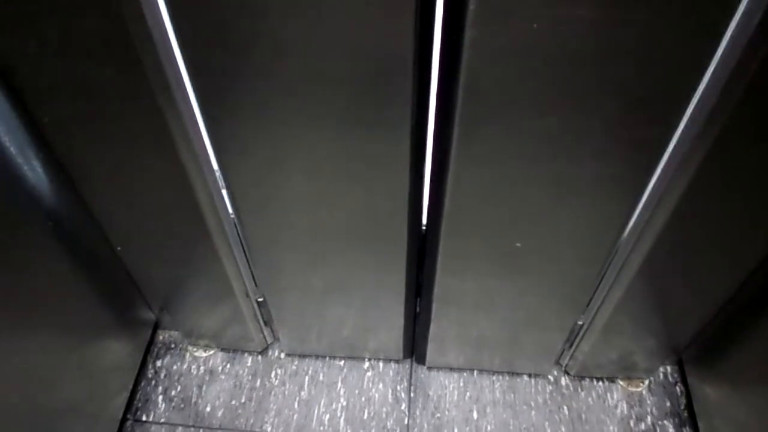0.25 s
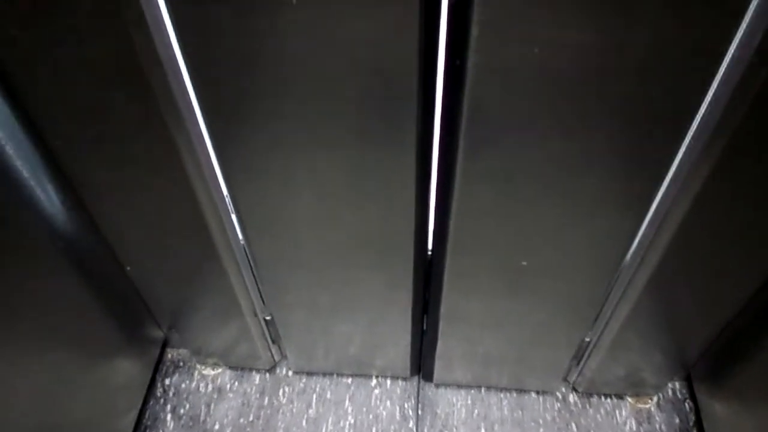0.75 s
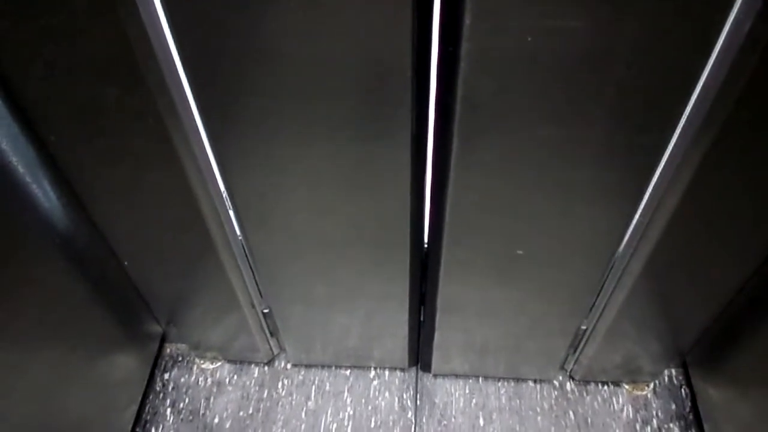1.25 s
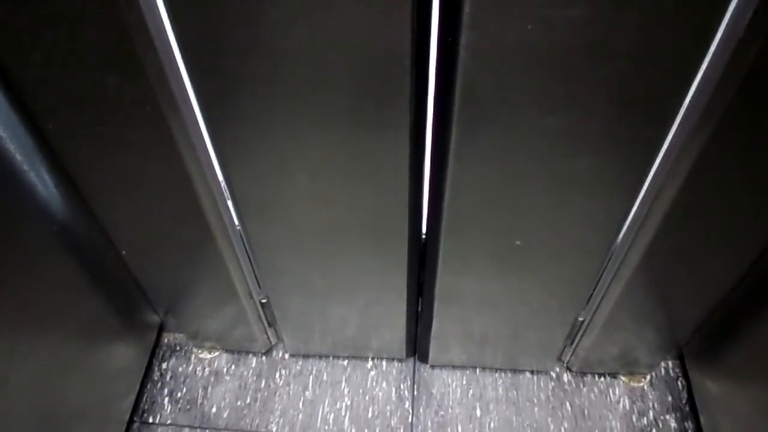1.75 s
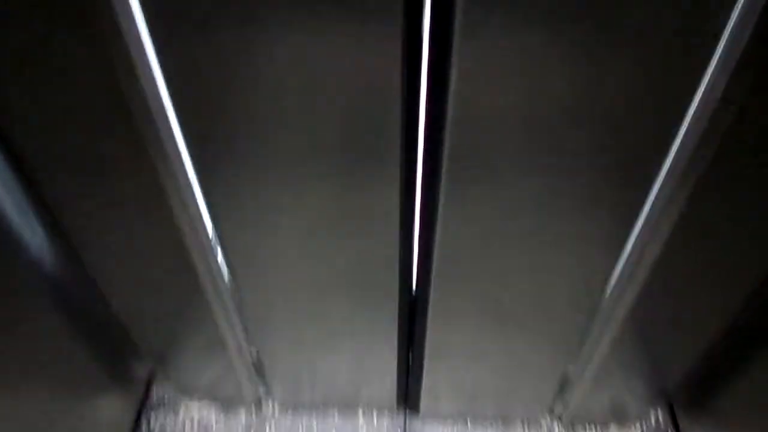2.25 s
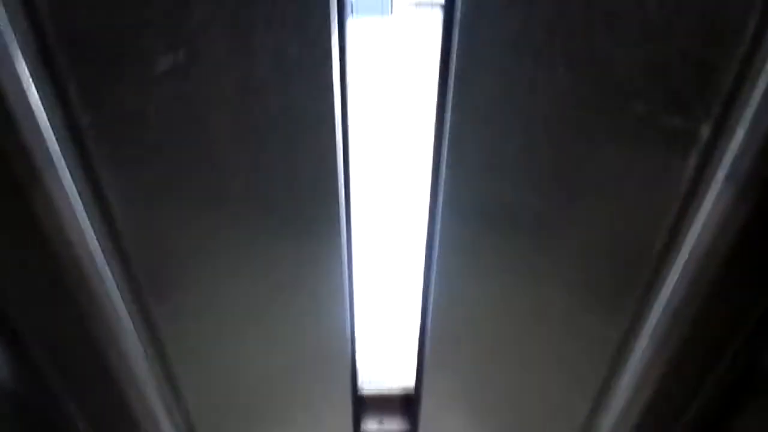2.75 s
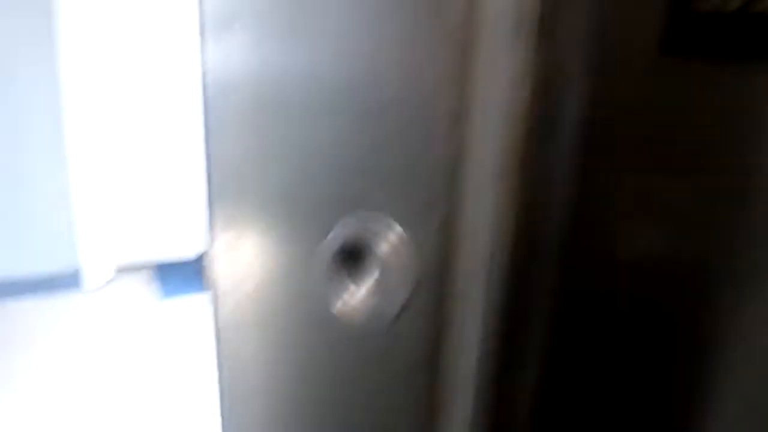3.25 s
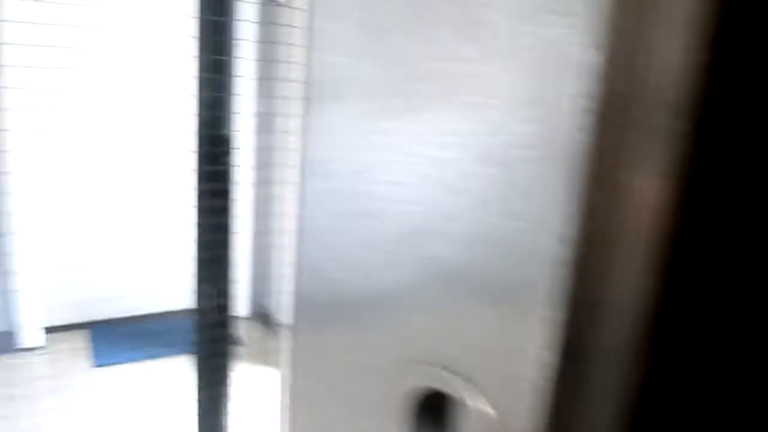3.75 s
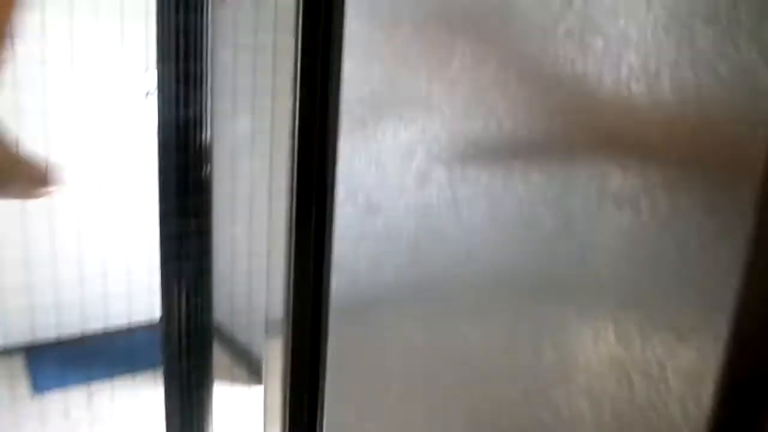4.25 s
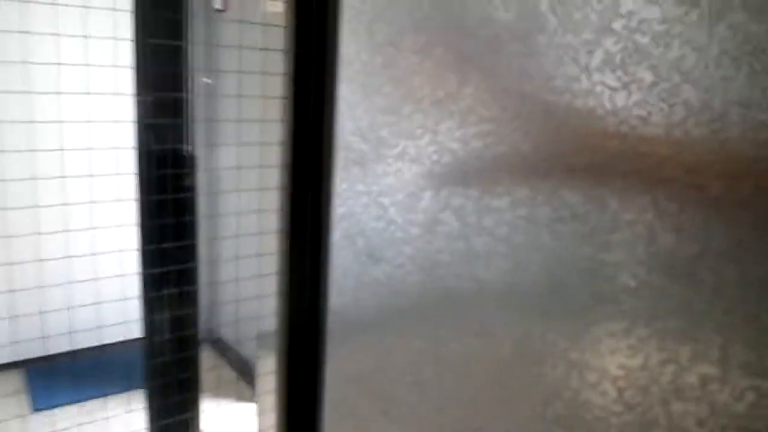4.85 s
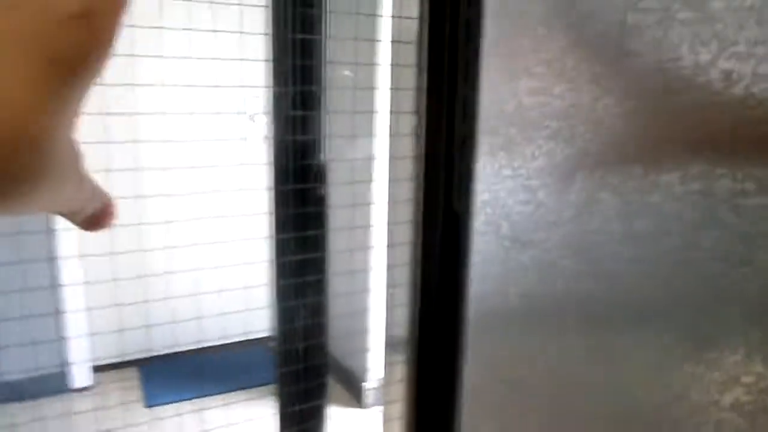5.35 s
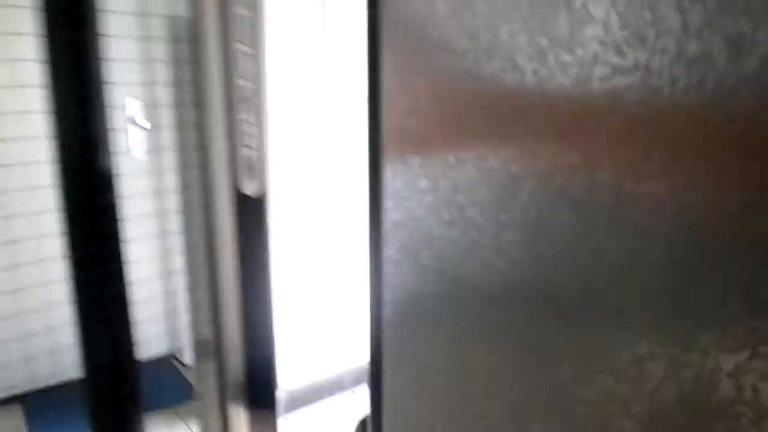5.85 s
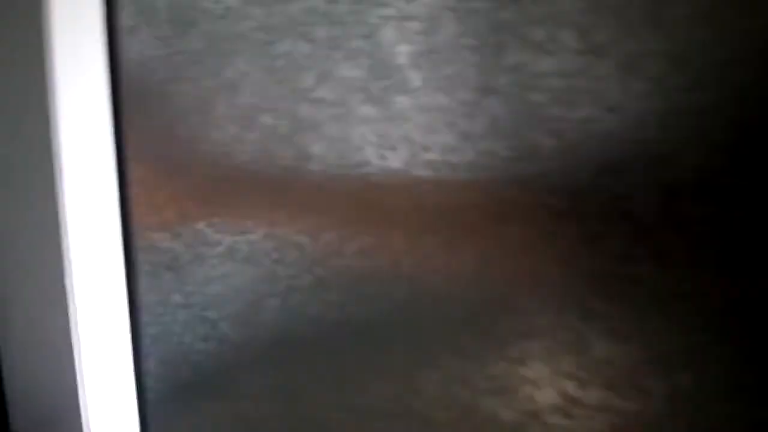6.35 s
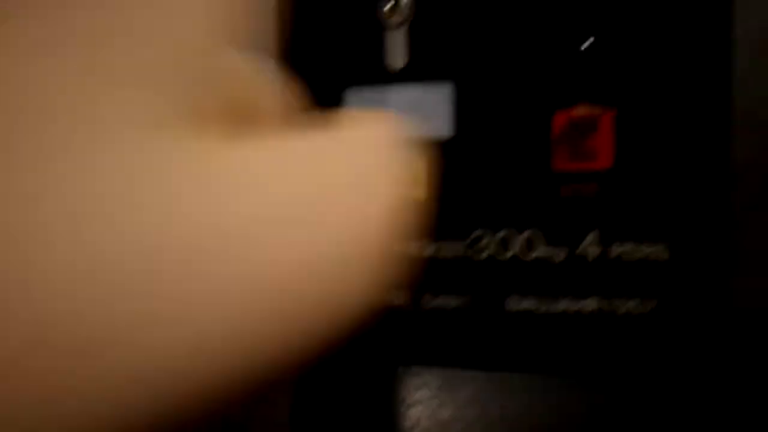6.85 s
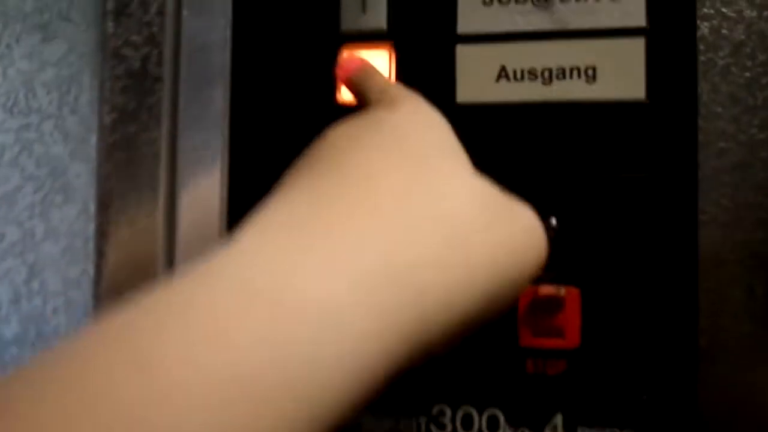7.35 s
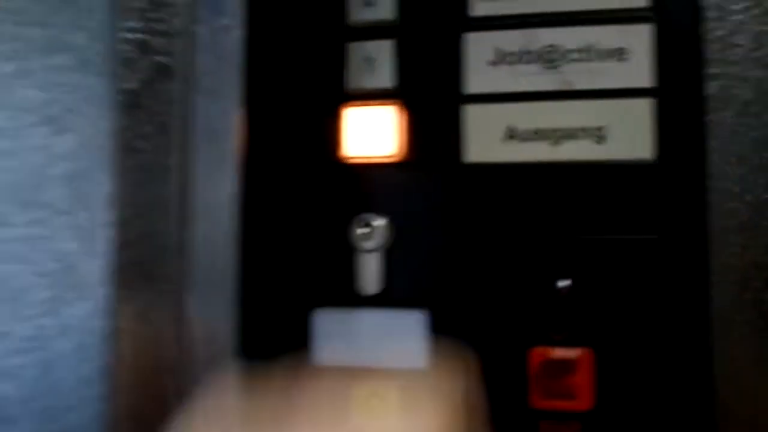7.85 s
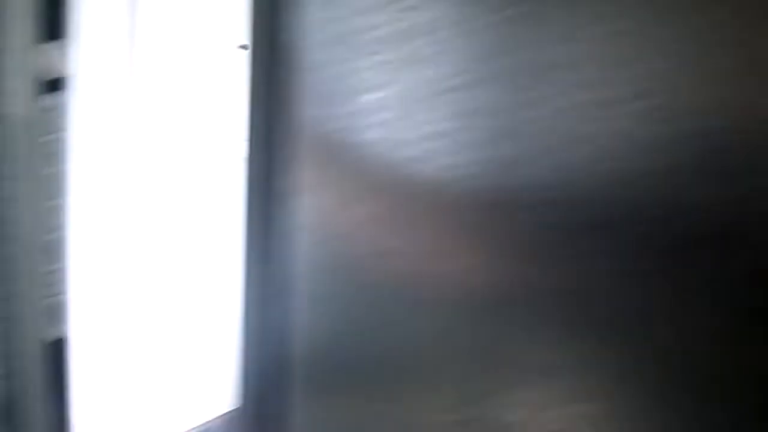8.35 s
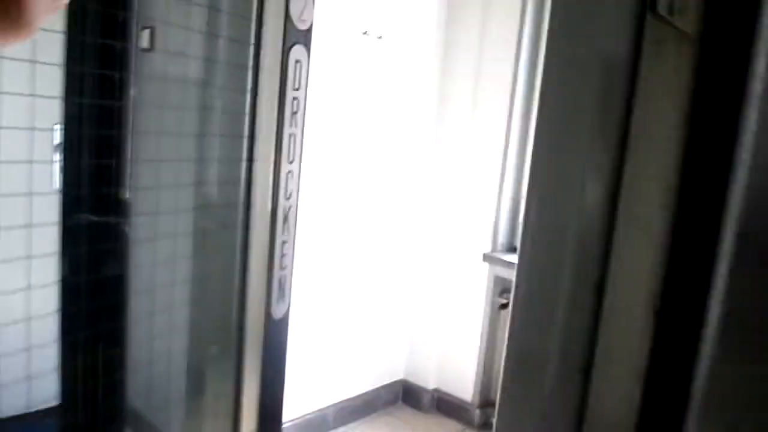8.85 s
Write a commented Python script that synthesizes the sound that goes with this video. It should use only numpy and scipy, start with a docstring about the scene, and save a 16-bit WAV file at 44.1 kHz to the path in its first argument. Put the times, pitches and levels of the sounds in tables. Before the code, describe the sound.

Close handheld microphone inside a cramped steel lift car. Nearly two seconds of faint air and hum, then folding metal doors rattle and bang open, with a second clatter and scraping travel. A harder double clank ends their movement near four seconds. A latch clicks, the landing door is knocked free with a sharp boom and rumbles as it swings. Light button clicks follow, and finally the door begins rumbling again.

```python
"""Inside a small steel lift car: the car shudders and hums, the folding doors rattle open and bang on their
stops, a latch snaps, a glass landing door swings out rumbling, and buttons click.
Blows are bursts of tiny contacts ringing through sheet steel; rattle, brushing and drone are shaped chance.
Jolts and travel stir deep resonances of the car, and the steel sounds echo briefly between hard walls."""
import sys
import numpy as np
from scipy import signal
from scipy.fft import rfft, irfft
from scipy.io import wavfile
from scipy.ndimage import uniform_filter1d

SR = 44100
rng = np.random.default_rng(int(sys.argv[2]) if len(sys.argv) > 2 else 0)


def undo_db(level):
    """Turn decibels back into plain size, where 20 dB means ten times bigger."""
    steps = np.asarray(level, float) / 20
    return 10 ** steps


def materialize(psi):
    """Save the field psi as 16-bit PCM at rate SR to the path in sys.argv[1].

    A 1-D psi becomes a single channel; in a 2-D psi each row is a channel.
    """
    bounded = np.clip(np.atleast_2d(psi).T, -1, 1)
    quanta = np.round(bounded * 32767).astype(np.int16)
    wavfile.write(sys.argv[1], SR, quanta)


N = 402005   # length in samples

# Background: broad low air noise: f/Hz, level/dB per Hz (shape only); then its rms level/dB
AIR_SPECTRUM = [(20, -8.5), (45, 2.5), (82, -12), (169, -51), (206, -17), (342, -21), (382, -43),
                (652, -28), (888, -28), (1690, -36.5), (15200, -40), (16500, -54)]
AIR_RMS_DB = -54.5
# Mains hum of the idle drive: f/Hz, mean level/dB rms
HUM_LINES = [(199.5, -75), (500, -83), (899, -79)]
# A faint tone swells once: start t/s, length t/s, f/Hz, level/dB rms
FAINT_TONE = (0.6, 0.1, 382, -67)
# Colour of hiss and brushing: f/Hz, level/dB per Hz (shape only)
HISS_SPECTRUM = [(880, 2), (2200, 2), (2970, 1.5), (8000, -2), (16000, -1.5)]
# Seals, guides and sleeves brush along steel: start t/s, length t/s, hiss level/dB
BRUSHES = [(2.0, 0.2, -56.5), (3.065, 0.034, -55.5), (3.2, 0.042, -64), (3.33, 0.016, -54),
           (3.424, 0.021, -49), (3.525, 0.21, -53.5), (3.813, 0.033, -59.5), (4.28, 0.019, -58),
           (4.325, 0.11, -46.5), (4.613, 0.024, -58.5), (5.517, 0.019, -50), (5.56, 0.27, -64.5),
           (5.862, 0.036, -55), (6.001, 0.076, -47.5), (8.66, 0.024, -53.5)]

# Reflections between the car walls, low to high range: f/Hz, time to fall 60 dB t/s
CAR_DECAYS = [(150, 0.46), (1500, 0.33), (10000, 0.23)]
BLOWS_ECHO_DB, CLICKS_ECHO_DB, RATTLE_ECHO_DB = -5, 0.5, -1

# How briskly the doors travel; steers rattle, shudder and boom: t/s, relative level/dB
TRAVEL = [(0.0, -64), (1.61, -63.5), (1.645, -60), (1.7, -42.5), (1.98, -35.5), (2.2, -39.5), (2.42, -41.5),
          (3.0, -54), (3.12, -48.5), (3.57, -44.5), (3.801, -39.5), (4.101, -43.5), (4.3, -57),
          (4.5, -59.5), (5.3, -56), (5.45, -46), (6.09, -48.5), (6.49, -56), (8.64, -60.5), (9.12, -48.5)]
# Stops and footfalls jolt the car: t/s, shudder level/dB, frame boom level/dB, shudder hold t/s
JOLTS = [(1.661, -56, -47, .03), (1.861, -26, -36, 0.03), (2.318, -39, -38, 0.031),
         (2.358, -25, -43, 0.034), (2.705, -40.5, -45.5, 0.33), (3.097, -58, -42, .05),
         (3.312, -45, -33.5, .03), (3.385, -42, -24.5, 0.049), (3.635, -38, -41.5, 0.03),
         (3.914, -27.5, -22, 0.2), (4.336, -39, -76, 0.038), (4.437, -44, -32, 0.14),
         (4.444, -49, -42, .02), (4.465, -59, -45, .02), (4.777, -45, -66, 0.09), (5.002, -41, -56, 0.013),
         (5.257, -32.5, -38, 0.022), (5.456, -43, -62, 0.082), (6.228, -48.5, -41.5, 0.094),
         (7.27, -49, -52.5, 0.04), (7.63, -58, -61, 0.041), (8.375, -52, -50.5, .02),
         (8.405, -39, -45, 0.079), (8.592, -40, -72, 0.058)]
# A second, looser shudder: f/Hz, width/Hz, level/dB
SWAY_MODE = (38.7, 8.5, -4)
# Low resonances of the frame: f/Hz, width/Hz, level/dB
FRAME_MODES = [(60, 8.7, 1.5), (87.4, 19.2, 3), (134.3, 6.2, -0.5), (178.6, 14.6, -4)]
# The floor plate answers only to jolts: f/Hz, width/Hz, level/dB
FLOOR_PLATE_MODE = (220, 46, -4.5)
# Resonances of the sheet steel panels: f/Hz, width/Hz, level/dB
PANEL_MODES = [(214.6, 30, -6.5), (361.3, 12.5, 5.5), (480, 250, -7.5), (535, 6.1, 2), (787, 3.8, -2.5),
               (1083, 2.2, 1.5), (1340, 18, -29), (1520, 11, 6), (1730, 19, -14)]
# Colour of the loose rattle: f/Hz, level/dB per Hz (shape only)
RATTLE_SPECTRUM = [(88, -33), (150, 3), (310, -9), (340, -4), (500, -6), (702, -9), (1520, -14),
                   (2800, -21.5), (6000, -38.5), (9000, -78)]

# A hinge slips: start time, then length t/s, from f/Hz, to f/Hz, level/dB before its uneven slips
SQUEAK_S = 3.52
SQUEAK = (.068, 1080, 1130, -41)
# Single parts ring on one note: t/s, f/Hz, level/dB, time to fall 60 dB t/s
PINGS = [(1.877, 907, -23, 0.046), (2.287, 1350, -21.5, 0.054), (3.936, 467, -6.5, 0.047),
         (4.783, 2200, -41, 0.032), (4.795, 4900, -43, 0.013), (7.113, 1550, -32.5, 0.044)]
# The landing door swings on its closer: start t/s, fastest t/s, rumble level/dB there
SWINGS = [(5.357, 6.052, -37.5), (8.897, 9.114, -38.5)]
# Colour of the swinging door's drone: f/Hz, level/dB per Hz (shape only)
RUMBLE_SPECTRUM = [(65, -39), (110, -10), (139, 9), (188, -8), (343, 2.5), (430, -13.5), (510, -10),
                   (640, -33), (760, -46), (1150, -19), (1500, -25.5), (2150, -19), (2600, -31),
                   (3250, -41), (5500, -120)]
# The landing door is knocked free: f/Hz, level/dB before a softened onset, time to fall 60 dB t/s
SLAM_S = 5.288
SLAM_MODES = [(157, -1.5, 0.099), (205, -0.5, 0.13), (250, -14.5, 0.31), (311, -12.5, 0.33),
              (362, -6.5, 0.26)]

# Lone dry ticks close by: t/s, relative level/dB
TICKS = [(2.0954, -29), (2.38, -3), (2.806, -22.5), (3.202, -26), (4.8763, -24), (5.0025, -30)]
# Sharp knocks and clicks of doors, latch and buttons:
# t/s, clank level/dB, clank centre f/Hz, snap and sizzle relative level/dB
CLICKS = [(1.873, -8, 1520, -34, -26), (1.888, -11.5, 1780, -38, -25), (2.289, -31, 1500, -32, -56),
          (3.706, -20, 1670, -54, -53), (3.708, -17, 600, -60, -65), (3.717, -19, 1380, -57, -55),
          (3.73, -22, 480, -48, -60), (3.857, -26, 696, -43, -54), (3.936, -12.5, 885, -24, -28.5),
          (3.947, -14, 605, -44, -41), (4.517, -32, 1510, -33.5, -52), (5.0647, -24.5, 1550, -12, -18),
          (5.0748, -21, 2020, -28, -31), (5.29, -22, 1850, -38, -4), (5.419, -34, 1930, -31, -43),
          (6.177, -29.5, 567, -62, -56), (6.179, -32.5, 1110, -49, -65), (6.686, -36, 1180, -42.5, -58),
          (7.11, -22.5, 1830, -35, -38), (7.271, -31.5, 2020, -49, -34.5), (7.283, -30.5, 825, -54, -36.5),
          (7.598, -38.5, 1280, -43, -40.5), (7.632, -22, 2250, -34, -44), (7.638, -28, 1080, -40, -33),
          (7.671, -33.5, 490, -37, -44), (8.899, -35, 1980, -61, -55)]
# Door panels bang and scrape: t/s, clank level/dB, clank centre f/Hz, thud and snap relative level/dB
BLOWS = [(1.637, -60, 593, -41, -72), (1.747, -40, 1020, -35, -50), (1.779, -22.5, 804, -27.5, -43),
         (1.82, -19, 690, -27, -31), (1.872, -6.5, 880, -18, -31), (1.885, -34, 870, -21, -31),
         (1.916, -16.5, 870, -22, -20.5), (1.943, -18.5, 540, -48, -23), (1.985, -26, 1300, -56, -34),
         (2.283, -22, 885, -22.5, -34), (2.297, -24, 1340, -23, -31), (2.318, -18, 545, -27.5, -34.5),
         (2.359, -25.5, 506, -27, -42), (2.45, -25, 600, -32, -47), (2.567, -37, 513, -37, -83),
         (2.598, -38, 501, -33, -44), (2.695, -40, 501, -34, -52), (2.84, -41.5, 501, -41, -69),
         (3.097, -38, 750, -39, -48), (3.199, -43, 600, -34.5, -46), (3.38, -36, 1490, -42, -68),
         (3.419, -36.5, 563, -51, -49), (3.515, -35, 557, -35, -49), (3.616, -34, 573, -40, -38.5),
         (3.874, -15.5, 480, -16.5, -30), (3.89, -10.5, 1090, -21, -21.5), (3.94, -13, 1350, -23, -33),
         (4.015, -22.5, 1020, -30, -41), (4.049, -40, 1100, -26.5, -47), (5.286, -10.5, 1880, -19, -10),
         (5.551, -44, 490, -38, -56), (5.638, -37, 610, -40, -47.5), (6.073, -37.5, 807, -36, -55),
         (8.658, -31.5, 1340, -44, -37.5), (8.895, -49, 500, -39, -62)]


def rms_one(x):
    """Scale to rms 1."""
    return x / np.sqrt(np.mean(x ** 2) + 1e-20)


def peak_one(x):
    """Scale to peak 1."""
    return x / (np.max(np.abs(x)) + 1e-20)


def band(x, low_hz, high_hz):
    """Butterworth band-pass."""
    return signal.sosfilt(signal.butter(2, [low_hz, high_hz], "band", fs=SR, output="sos"), x)


def resonate(x, modes):
    """Parallel resonances of (f/Hz, width/Hz, level/dB) with alternating signs."""
    out = 0
    for k, (hz, width, db) in enumerate(modes):
        r = np.exp(-np.pi * width / SR)
        poles = [1, -2 * r * np.cos(2 * np.pi * hz / SR), r * r]
        ring = signal.lfilter([(1 - r * r) / 2, 0, (r * r - 1) / 2], poles, x)
        out = out + (-1) ** k * undo_db(db) * ring
    return out


def colour(x, spectrum):
    """Weight the spectrum by a curve of (f/Hz, level/dB per Hz); rms 1."""
    hz, db = np.transpose(spectrum)
    grid = np.arange(N // 2 + 1) * SR / N + 1
    gain_db = np.interp(np.log(grid), np.log(hz), db)
    return rms_one(irfft(rfft(x) * undo_db(gain_db), N))


def drift(rate):
    """Slow chance through normal random knots, rate of them a second."""
    knots = rng.standard_normal(int(N / SR * rate) + 2)
    return np.interp(np.arange(N) / SR * rate, np.arange(len(knots)), knots)


def swell(start, length, db, rise_db_per_s, fall_db_per_s):
    """Gain that climbs to its level, holds it and falls away."""
    t = np.arange(N) / SR - start
    return undo_db(db - rise_db_per_s * np.maximum(-t, 0) - fall_db_per_s * np.maximum(t - length, 0))


def evened(x, window_s):
    """A vibration that is kept going: its swells are flattened; rms 1."""
    power = uniform_filter1d(x ** 2, int(window_s * SR))
    return rms_one(x / np.sqrt(power + 1.4 * np.mean(x ** 2)))


def grains(count, per_s, spread_db):
    """Random contacts of uneven size; rms 1."""
    sizes = undo_db(spread_db * np.minimum(rng.exponential(1, count), 5)) * rng.choice([-1, 1], count)
    return rms_one(sizes * (rng.random(count) < per_s / SR))


def smooth_toned(x, lump_hz):
    """Level the chance lumps of a dying sound's spectrum, keeping its broad colour."""
    spectrum = rfft(x)
    power = np.abs(spectrum) ** 2
    bins = max(int(lump_hz * len(x) / SR), 3)
    broad = uniform_filter1d(power, 12 * bins)
    lumpy = uniform_filter1d(uniform_filter1d(power, bins), bins)
    levelled = irfft(spectrum * np.sqrt(broad / (lumpy + 1e-30)), len(x))
    return levelled * (np.arange(len(x)) < len(x) * 7 // 8)   # drop what wraps round to the end


def car(x):
    """Reflections between the close walls: noise, strongest early, that dies faster in the treble."""
    t, tail = np.arange(SR // 2) / SR, 0
    edges_hz = [30, 500, 4000, 18000]
    for low, high, (_, t60) in zip(edges_hz, edges_hz[1:], CAR_DECAYS):
        noise = band(rng.standard_normal(len(t)), low, high)
        early = 1 + 1.6 * np.exp(-t / 0.018)
        tail = tail + noise * undo_db(-60 * t / t60) * early * (t > .002)
    tail = smooth_toned(tail, lump_hz=116)
    return signal.fftconvolve(x, tail / np.sqrt(np.sum(tail ** 2)))[:len(x)]


def place(events):
    """Lay (t/s, sound, echo level/dB) in time, each with fresh reflections of its own."""
    out = np.zeros(N + SR)
    for s, sound, echo_db in events:
        out[round(s * SR):][:len(sound)] += sound + undo_db(echo_db) * car(sound)
    return out[:N]


def panels(x, broad_db):
    """Sheet steel: marked resonances over a broad bed that passes the sound unchanged."""
    return resonate(x, PANEL_MODES) + undo_db(broad_db) * x


def air():
    """Steady noise, heaviest in the bass."""
    return undo_db(AIR_RMS_DB) * colour(rng.standard_normal(N), AIR_SPECTRUM)


def hum():
    """Thin sine lines that waver in level, and one faint tone that swells once."""
    t = np.arange(N) / SR
    start, length, tone_hz, tone_db = FAINT_TONE
    lines = sum(undo_db(db + 3.3 * drift(11)) * np.sin(2 * np.pi * hz * t) for hz, db in HUM_LINES)
    tone = swell(start, length, tone_db, 70, 70) * np.sin(2 * np.pi * tone_hz * t)
    return np.sqrt(2) * (lines + tone)   # rms to peak


def hiss_and_brushes(loud_sound):
    """Coloured noise: a steady hiss of air that sinks under loud sound, and passing brushes of steel."""
    noise = colour(rng.standard_normal(N) * undo_db(1.0 * drift(23)), HISS_SPECTRUM)
    # the hiss is louder once the landing is open, from 4.8 s
    hiss = undo_db(np.where(np.arange(N) < 4.8 * SR, -64.5, -59))
    busy_db = 10 * np.log10(signal.lfilter([.0003], [1, -.9997], loud_sound ** 2) + 1e-12)
    hiss = hiss * undo_db(-0.8 * np.maximum(busy_db + 37.5, 0))
    brushing = sum(swell(s, length, db, rise_db_per_s=350, fall_db_per_s=174) for s, length, db in BRUSHES)
    return (hiss + brushing) * noise


def shudder(travel_db):
    """The whole car sways on two very low resonances, driven by travel and jolts."""
    shaking = undo_db(-54) + undo_db(travel_db - 11)   # at rest, and under way
    for s, db, _, hold_s in JOLTS:
        shaking += swell(s, hold_s, db, rise_db_per_s=390, fall_db_per_s=122)
    shaking *= undo_db(2.7 * drift(7.1))   # the car rocks unevenly
    modes = [(28.1, 2.8, 0), SWAY_MODE]
    return shaking * evened(resonate(rng.standard_normal(N), modes), window_s=0.04)


def boom(travel_db):
    """Sparse contacts keep the low frame resonances going, louder with travel and jolts."""
    booming = undo_db(travel_db - 2)
    for s, _, db, _ in JOLTS:
        booming = booming + swell(s, 0.026, db, rise_db_per_s=1500, fall_db_per_s=158)
    ring = resonate(grains(N, per_s=300, spread_db=3.0), FRAME_MODES)
    return booming * evened(band(ring, 54.0, 280), window_s=0.045)


def knocks():
    """Each jolt is one push into the resonances of the frame and floor plate."""
    pushes = np.zeros(N) + 1e-18
    moments = [round(row[0] * SR) for row in JOLTS]
    pushes[moments] = undo_db(np.array(JOLTS)[:, 2] + 4)   # 4 dB over the boom
    ring = band(resonate(pushes, FRAME_MODES + [FLOOR_PLATE_MODE]), 48, 370)
    return ring * np.max(pushes) / np.max(np.abs(ring))


def rattle(travel_db):
    """Rollers and hinges knock in clumps against the panels as the doors travel, and echo in the car."""
    loose = grains(N, per_s=1500, spread_db=4.5) * undo_db(2.7 * drift(21))
    direct = undo_db(travel_db - 4.0) * colour(panels(loose, broad_db=-2.0), RATTLE_SPECTRUM)
    return direct + undo_db(RATTLE_ECHO_DB) * car(direct)


def hinge():
    """Fast uneven slips on a rising pitch, with a faint upper partial."""
    length, from_hz, to_hz, db = SQUEAK
    phase = np.clip((np.arange(N) / SR - SQUEAK_S) / length, 0, 1)
    pitch_hz = from_hz + (to_hz - from_hz) * phase + 110 * drift(500)
    turn = 2 * np.pi * np.cumsum(pitch_hz) / SR
    slips = (np.sin(turn) + undo_db(-26) * np.sin(2.9 * turn)) * undo_db(5.5 * drift(250))
    arch = np.sqrt(np.sin(np.pi * phase) + 1e-12) * (phase < 1)
    return undo_db(db) * arch * slips


def pings():
    """Single short modes, dying sines that echo in the car."""
    t = np.arange(SR // 2) / SR
    return place([(s, undo_db(db - 60 * t / t60) * np.sin(2 * np.pi * hz * t), BLOWS_ECHO_DB)
                  for s, hz, db, t60 in PINGS])


def landing_door():
    """The heavy leaf booms when knocked free, then drones in its low resonances while it swings."""
    gain = 0
    for start, fastest, db in SWINGS:   # the drone grows up to the fastest moment, then fades
        moving = np.arange(N) > start * SR
        gain = gain + moving * swell(fastest, 0, db, rise_db_per_s=7.5, fall_db_per_s=42)
    since = np.maximum(np.arange(N) / SR - SLAM_S, 0)
    slam = sum(undo_db(db - 60 * since / t60) * np.sin(2 * np.pi * hz * since) for hz, db, t60 in SLAM_MODES)
    slam = slam * (1 - np.exp(-since / 0.0083))   # the leaf yields for a moment
    drone = colour(panels(grains(N, per_s=2000, spread_db=-1.0), broad_db=-3.5), RUMBLE_SPECTRUM)
    creak = band(drone, 1100, 4000)   # the upper part comes and goes in patches
    low_drone = evened(drone - creak, window_s=0.035) * undo_db(0.8 * drift(18))
    return slam + gain * (low_drone + creak * undo_db(2.9 * drift(21)))


def ticks():
    """Dry impulses, mostly low-passed body with a little bare edge, without echo."""
    impulses = np.zeros(N) + 1e-18
    impulses[[round(s * SR) for s, _ in TICKS]] = undo_db(np.array(TICKS)[:, 1] + 13.5)
    return -1.54 * band(impulses, 40, 1000) - 0.094 * impulses


def strike(clank_db, centre_hz, thud_db, snap_db, sizzle_db, swell_s, first, sudden, broad_db, low_hz, top_hz):
    """A first contact, then a chatter of small ones that swells and dies, heard in four ranges of the steel."""
    t = np.arange(SR // 2) / SR / max(swell_s, .001)   # in swell times
    chatter = grains(len(t), per_s=4000, spread_db=3.0) * (sudden + t) * np.exp(-t) + 1e-18
    chatter[0] = first
    chatter = smooth_toned(chatter, lump_hz=208)
    steel = panels(chatter, broad_db)
    clank = band(steel, low_hz, top_hz)
    # the struck part colours the clank
    clank = 0.36 * clank + 1.4 * resonate(clank, [(centre_hz, 0.77 * centre_hz, 0)])
    thud = band(steel, 134, 473)
    snap = band(chatter, 1700, 5870)
    sizzle = band(chatter * (1 - 0.63 * np.exp(-t / 0.084)), 8200, 15800)   # softened onset
    # alternate signs join the ranges smoothly
    low = undo_db(thud_db + 2.0) * peak_one(thud) - undo_db(clank_db) * peak_one(clank)
    return low + undo_db(snap_db + 2.5) * peak_one(snap) - undo_db(sizzle_db + 7.5) * peak_one(sizzle)


def clicks():
    """Sharp knocks and clicks of doors, latch and buttons: a hard first contact, a very short chatter."""
    return place([(s, strike(db, hz, db - 17.0, snap, sizzle, swell_s=0.0028, first=11.1, sudden=0.96,
                             broad_db=4, low_hz=0.38 * hz, top_hz=1.72 * hz), CLICKS_ECHO_DB)
                  for s, db, hz, snap, sizzle in CLICKS])


def blows():
    """Door panels bang and scrape: a softer first contact and a longer chatter in the sheet steel."""
    return place([(s, strike(db, hz, thud, snap, snap - 8, swell_s=0.01, first=2.15, sudden=0.32,
                             broad_db=-1.5, low_hz=410, top_hz=2010), BLOWS_ECHO_DB)
                  for s, db, hz, thud, snap in BLOWS])


def scene():
    """Motion drives shudder, boom and rattle; blows and clicks ring in the car over hiss, air and hum."""
    travel_db = np.interp(np.arange(N) / SR, *np.transpose(TRAVEL))
    deep = shudder(travel_db) + boom(travel_db) + knocks()
    steel = rattle(travel_db) + hinge() + pings() + landing_door() + ticks() + clicks() + blows()
    return (air() + hum() + hiss_and_brushes(steel + deep) + deep + steel)[None]


def low_pass(x):
    """Removes everything above the highest recorded frequency."""
    return signal.sosfilt(signal.butter(12, 16820, fs=SR, output="sos"), x)


def record(dry):
    """A gentle gain control ducks after loud blows and recovers, peaks are rounded, the top is cut."""
    level_db = 10 * np.log10(uniform_filter1d(dry[0] ** 2, size=441) + 1e-12)
    climb = 40 * np.arange(N) / SR   # the held level falls 40 dB per s
    held_db = np.maximum.accumulate(level_db + climb) - climb
    cut_db = 0.22 * np.maximum(held_db + 28.0, 0)
    cut_db = signal.lfilter([.002], [1, -.998], cut_db)   # eases in and out
    rounded = 0.78 * np.tanh(dry * undo_db(-cut_db) / 0.87)
    top_cut = signal.ellip(8, .5, 50, 16000, fs=SR, output="sos")
    mix = signal.sosfilt(top_cut, rounded)
    return low_pass(mix)


dry = scene()
out = record(dry)
materialize(out)
```